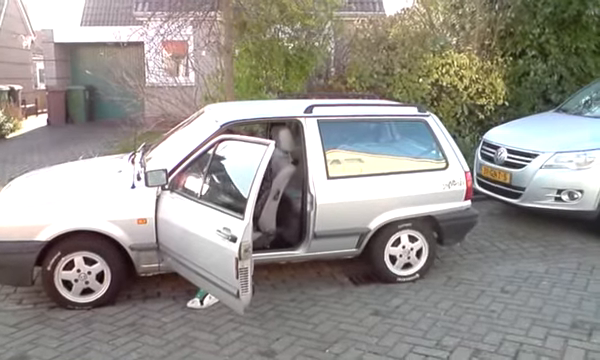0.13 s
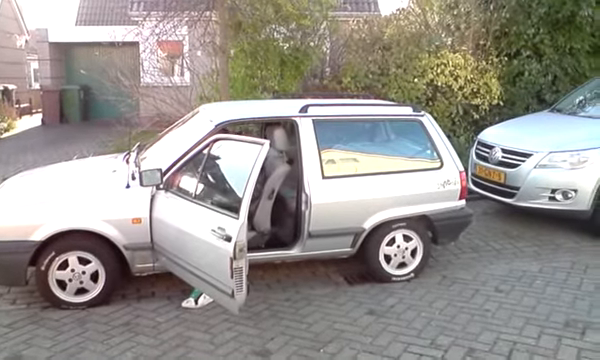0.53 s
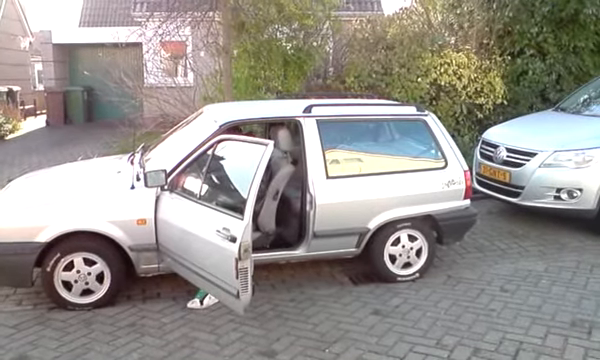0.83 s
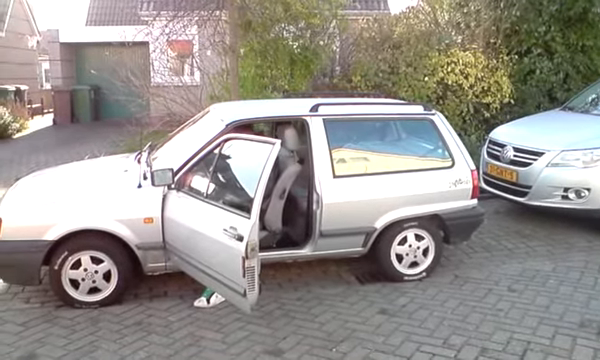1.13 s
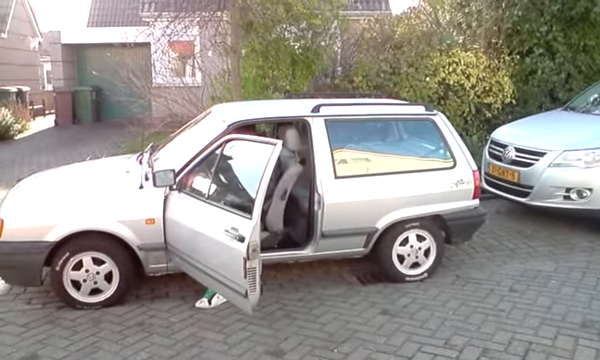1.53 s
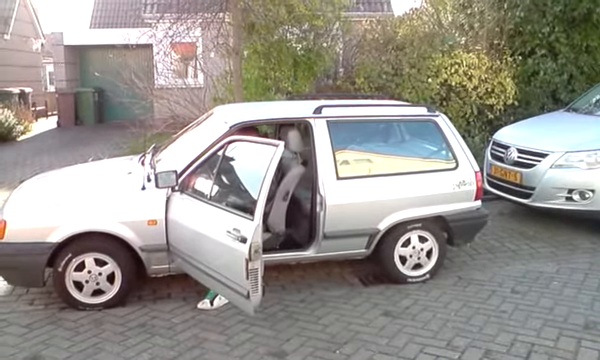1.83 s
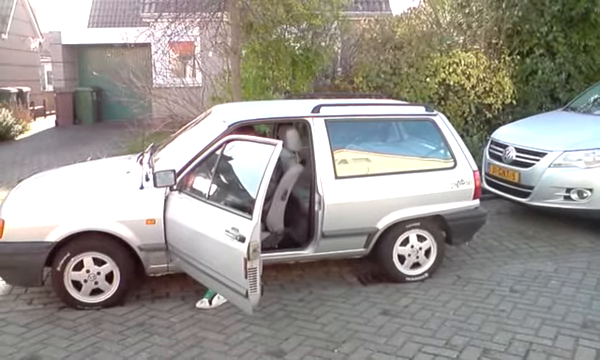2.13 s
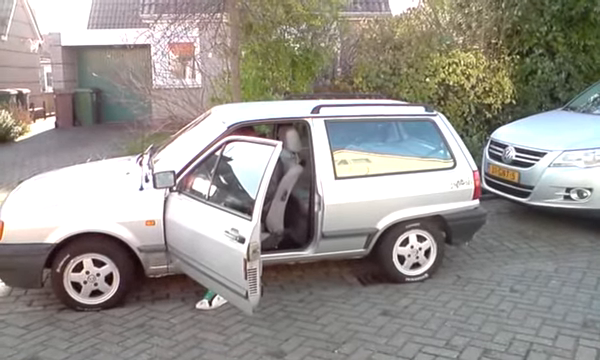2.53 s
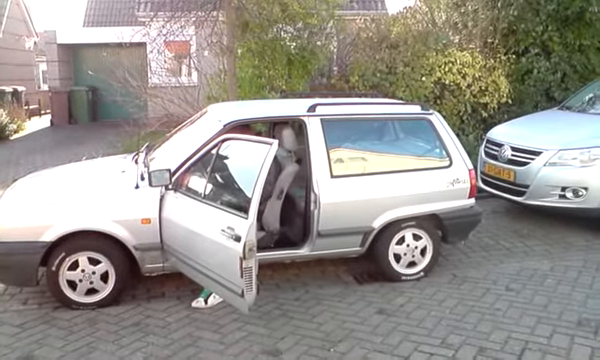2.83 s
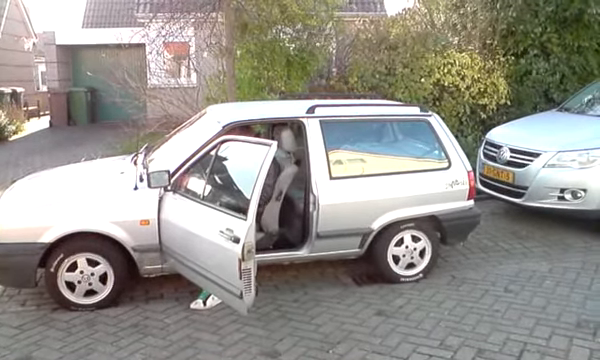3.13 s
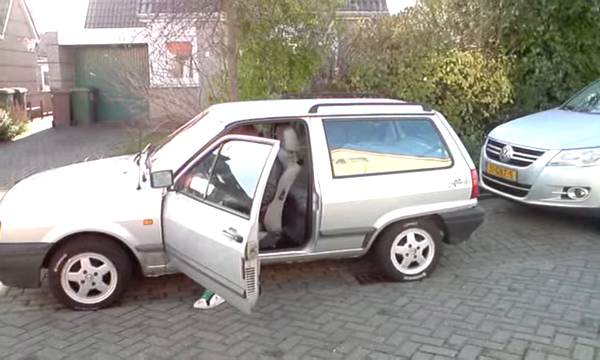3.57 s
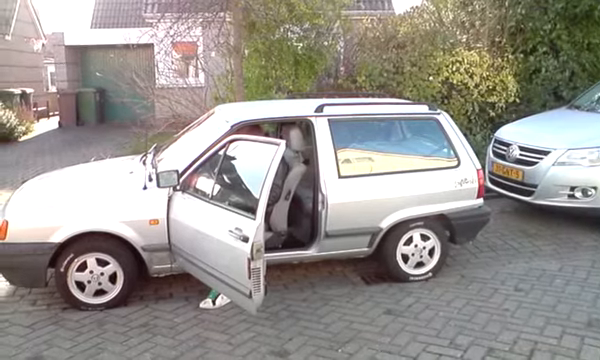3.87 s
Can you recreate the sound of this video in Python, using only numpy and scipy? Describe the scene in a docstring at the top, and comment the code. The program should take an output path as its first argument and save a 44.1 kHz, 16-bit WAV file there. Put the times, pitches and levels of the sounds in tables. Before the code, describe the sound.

Car starter cranking outdoors: first sparse key and lock clicks, then the hiss steps up with soft cabin knocks, brighter key jingles, and finally a sharp metallic clash and laboured cranking, mono with dulled top treble.

```python
"""Keys click and tinkle in an ignition lock over a quiet outdoor hiss: a small car on a paved driveway, door open.
Filtered contact noise makes the clicks and damped tones the tinkles; the hiss steps up and soft knocks follow.
The starter pinion slams into the flywheel: bursts of contact noise that ring the modes of the gears.
Then it cranks: random-strength tooth knocks, scraping and whine slow down and swell against each compression,
and the gears rattle loosely, mostly after a load peak as the piston goes over the top."""
import sys
import numpy as np
from scipy import signal
from scipy.fft import rfft, irfft, next_fast_len
from scipy.io import wavfile
from scipy.ndimage import uniform_filter1d, map_coordinates

SR = 44100
rng = np.random.default_rng(int(sys.argv[2]) if len(sys.argv) > 2 else 0)


def master(y):
    """Save y as 16-bit WAV."""
    cut = np.clip(np.atleast_2d(y).T, -1, 1)
    pcm = np.round(cut * 32767)  # scale
    wavfile.write(sys.argv[1], SR, pcm.astype(np.int16))


N = 176400


def amp(db):
    """Decibels to gain."""
    return 10 ** (np.asarray(db) / 20)


def unit(x):
    """Scale to rms 1."""
    return x / np.sqrt(np.mean(x ** 2) + 1e-20)


def clock():
    """Time of each sample in seconds."""
    return np.arange(N) / SR


def along(points, hz):
    """Gain through (freq_hz, level_db) points, read on a log frequency axis."""
    freq_hz, level_db = np.transpose(points)
    return amp(np.interp(np.log(hz + 1), np.log(freq_hz + 1), level_db))


def resonant(modes, hz, peak_db):
    """Resonances that stand above a flat response."""
    peaks = sum(amp(db) ** 2 / (1 + (2 * (hz - f) / width) ** 2) for f, width, db in modes)
    return np.sqrt(1 + amp(peak_db) ** 2 * peaks)


def colour(x, gain):
    """Causal, minimum-phase filter with the given gain over frequency."""
    m = 2 * next_fast_len(N // 2 + SR // 8)
    log_gain = np.log(np.maximum(gain(np.fft.rfftfreq(m, 1 / SR)), 1e-6))
    cepstrum = irfft(log_gain, m)
    # folding the cepstrum forward in time makes the filter causal
    cepstrum[1:m // 2] *= 2
    cepstrum[m // 2 + 1:] = 0
    return irfft(rfft(x, m) * np.exp(rfft(cepstrum)), m)[:N]


def shaped(x, gain):
    """Colour that keeps the power of a white input."""
    mean_power = np.mean(gain(np.linspace(0, SR / 2, N // 8)) ** 2)
    return colour(x, gain) / np.sqrt(mean_power)


def decay(start, t60, attack):
    """Quick rise, exponential fall of 60 dB per t60."""
    age = np.maximum(clock() - start, 0)
    return (1 - np.exp(-age / attack)) * amp(-60 * age / t60)


def swell(t, rise, fall):
    """A smooth hump around t = 0."""
    return np.exp(-.5 * (t / np.where(t < 0, rise, fall)) ** 2)


def grit(per_s):
    """Tiny metal contacts at random moments, rms 1."""
    return unit(rng.standard_normal(N) * (rng.random(N) < per_s / SR))


def strikes(envelopes, brightness, gain, split_hz):
    """Bursts of contact noise, each with its own share of treble above the split."""
    contacts = unit(np.sign(grit(per_s=14000)))
    dull = contacts * sum(envelopes)
    bright = contacts * sum(e * amp(b) for e, b in zip(envelopes, brightness))
    b, a = signal.butter(1, split_hz, fs=SR)
    bass = signal.lfilter(b, a, dull)
    treble = bright - signal.lfilter(b, a, bright)
    return shaped(bass + treble, gain)


# compression strokes: peak_load_s, buildup_s, load_db,
# loaded_hz (tooth rate one stroke alone drags the spun-up gears to), grind_lead_s, housing_ring_db
COMPRESSIONS = [(3.312, .035, -4, 291.6, 0, -1.5), (3.445, .04, 0.5, 240.4, 0.027, -2.5),
                (3.603, 0.041, -1.5, 310.7, 0.015, -2.5), (3.738, .028, -1.5, 319, 0.02, -4),
                (3.862, 0.027, -3, 321.1, 0.014, 0.5), (3.99, .035, -2.5, 336.6, 0.016, -21)]
# resonances of the starter and bell housing: freq_hz, width_hz, level_db
HOUSING_MODES = [(713, 30, -6), (765, 30, -5), (862, 30, -3), (910, 35, -6), (1017, 30, -10),
                 (1147, 35, -8), (1300, 45, -10), (1450, 35, -9), (1729, 40, -11), (1870, 40, -9),
                 (1962, 40, -9), (2077, 35, -4), (2555, 30, -5), (2630, 45, -4)]
# relative spectrum of the meshing teeth: freq_hz, level_db
MESH_SPECTRUM = [(30, -44), (100, -45), (220, -8), (340, -13.5), (480, -12), (700, -4), (900, -2.5),
                 (1200, -16.5), (2500, -22.5), (6000, -39)]
# relative spectrum of the grinding teeth: freq_hz, level_db
GRIND_SPECTRUM = [(40, -57), (200, -43), (600, -7.5), (1200, -5.5), (1600, -6.5), (2100, -4), (2650, -8.5),
                  (2850, -11.5), (4200, -8), (5200, -19.5), (7000, -25), (10000, -35)]
# gear whine at the first multiples of the tooth rate, before the load: level_db
WHINE_LEVELS = [-50, -49, -45, -47, -49, -48, -50]
CRANK_S, SPIN_UP_S, FREE_HZ = 3.235, .07, 538.2  # motor start, its time constant, free tooth rate
RELEASE_S, IDLE_LOAD_DB = 0.034, -25  # fall of the load after its peak, load between strokes
MESH_DB, GRIND_DB = -41, -36


def cranking(jitter_s=.00006, scatter_db=4.0, rough=0.7, gate=0.3, slow_lag_s=.018, recover_s=.03, flutter_db=2):
    """Each tooth knocks the housing and scrapes; each compression makes the teeth slower and louder."""
    t = clock()
    running = np.clip((t - CRANK_S) / 0.017, 0, 1)
    drag_hz, load, friction = 0, amp(IDLE_LOAD_DB), amp(IDLE_LOAD_DB)
    for peak_s, rise_s, load_db, loaded_hz, lead_s, _ in COMPRESSIONS:
        # the teeth slow down a little after the load peaks; the grinding may come ahead of it
        drag_hz = drag_hz + (FREE_HZ - loaded_hz) * swell(t - peak_s - slow_lag_s, rise_s, recover_s)
        load = load + amp(load_db) * swell(t - peak_s, rise_s, RELEASE_S)
        friction = friction + amp(load_db) * swell(t - peak_s + lead_s, rise_s, RELEASE_S)
    spin_up = 1 - np.exp(-np.maximum(t - CRANK_S, 0) / SPIN_UP_S)
    teeth = np.cumsum((FREE_HZ - drag_hz) * spin_up) / SR  # teeth passed so far

    # one knock per tooth, with random timing and strength
    tooth_s = np.interp(np.arange(1, int(teeth[-1])), teeth, t)
    chance = rng.standard_normal((1000, 2))[:len(tooth_s)]
    where = np.clip((tooth_s + jitter_s * chance[:, 0]) * SR, 0, N - 1).astype(int)
    knocks = unit(np.bincount(where, amp(scatter_db * chance[:, 1]), N)) * np.sqrt(running.mean())

    contact = (knocks + rough * grit(per_s=4300)) * load * running
    mesh = shaped(contact, lambda f: along(MESH_SPECTRUM, f) * resonant(HOUSING_MODES, f, peak_db=16.5))

    # the scraping pulses once per tooth
    scrape = unit(grit(per_s=7000) * (1 + gate * np.cos(2 * np.pi * teeth))) + 0.39 * knocks
    grind = shaped(scrape * friction * running,
                   lambda f: along(GRIND_SPECTRUM, f) * resonant(HOUSING_MODES, f, peak_db=16))

    whine = 0
    for k, level_db in enumerate(WHINE_LEVELS):
        flutter = amp(flutter_db * map_coordinates(rng.standard_normal(260), [t * 60]))
        whine = whine + amp(level_db) * flutter * np.sin(2 * np.pi * (k + 1) * teeth)
    return amp(MESH_DB) * mesh + amp(GRIND_DB) * grind + whine * load * running


RING_HZ, RING_DB = 854.8, -32.5  # the housing's strongest mode, its level before each stroke's own


def housing_ring(lag_s=.009, rise_s=.018, fall_s=0.014, stray_hz=6):
    """The housing sings briefly at the top of each compression, one slightly detuned tone each."""
    t = clock()
    ring = 0
    for peak_s, *_, ring_db in COMPRESSIONS:
        hz = RING_HZ + stray_hz * rng.standard_normal()
        tone = np.sin(2 * np.pi * hz * (t - peak_s))
        ring = ring + amp(RING_DB + ring_db) * swell(t - peak_s - lag_s, rise_s, fall_s) * tone
    return ring


# the loose gears rattle: start_s, level_db, t60_s (before the extra fade)
LOOSE_GEARS = [(3.275, -44, 0.87), (3.365, -53, 0.25), (3.511, -46, 0.73), (3.568, -50, .12),
               (3.645, -44, 0.72), (3.78, -44, 0.64), (3.905, -45.5, 0.66)]
# relative spectrum of the rattle: freq_hz, level_db
RATTLE_SPECTRUM = [(40, -47), (200, -44), (800, -5), (2500, -15), (3100, -8), (4000, 0.5), (5000, -0.5),
                   (5600, -7.5), (7000, -18.5), (10000, -24)]


def rattle(attack_s=0.0057, fade_s=0.96, clump_db=-0.5):
    """Bright, uneven chatter of the loose gears, started at listed moments, mostly after a load peak."""
    t = clock()
    level = 0
    for start_s, level_db, t60_s in LOOSE_GEARS:
        fade = amp(-60 * (np.maximum(t - start_s, 0) / fade_s) ** 3)
        level = level + amp(level_db) * decay(start_s, t60_s, attack_s) * fade
    clumps = amp(clump_db * unit(uniform_filter1d(rng.standard_normal(N), size=200)))
    return shaped(unit(grit(per_s=4000) * clumps) * level, lambda f: along(RATTLE_SPECTRUM, f))


# blows of the solenoid and pinion: start_s, level_db (before the trims below), brightness_db, t60_s (of the clash)
PINION_BLOWS = [(3.207, -48, 9, .1), (3.2126, -47.5, 16, 0.23), (3.218, -30, 2, 0.055),
                (3.2298, -22.5, 5.5, 0.097), (3.2384, -16, 1.5, 0.047), (3.2464, -18.5, -19, 0.058),
                (3.258, -28.5, -25, 0.11)]
# resonances of the pinion and ring gear: freq_hz, width_hz, level_db
GEAR_MODES = [(766, 40, -1), (911, 45, 4), (962, 35, -3), (1147, 35, -5), (1428, 26, -3), (1869, 30, -4),
              (2306, 22, -10), (2557, 30, -8), (2675, 22, -8), (3760, 60, -7), (4410, 55, -3),
              (4877, 30, -5), (5050, 34, -7), (5220, 45, -9)]
# relative spectrum of the clash: freq_hz, level_db
CLASH_SPECTRUM = [(40, -48), (150, -16.5), (480, -15), (760, 2), (950, 2), (1300, -5), (2600, -2),
                  (3000, -10.5), (4400, -2), (5100, -3.5), (5800, -12.5), (8000, -21), (10500, -28.5)]
CLASH_DB, CLANG_DB = -1, -11.5  # trims: noise of the blows, ringing of the gears under each


def engagement(bright_hz=2600):
    """The solenoid throws the pinion into the ring gear: a few clashing blows, each ringing the gears."""
    bursts = [amp(level_db) * decay(start_s, t60_s, attack=.0007) for start_s, level_db, _, t60_s in PINION_BLOWS]
    clash = strikes(bursts, [row[2] for row in PINION_BLOWS],
                    lambda f: along(CLASH_SPECTRUM, f) * resonant(GEAR_MODES, f, peak_db=7), split_hz=bright_hz)

    clang, age = np.zeros(N), clock()[:SR // 4]
    onset = np.sin(np.pi / 2 * np.minimum(age / .002, 1)) ** 2
    for start_s, level_db, bright_db, _ in PINION_BLOWS:
        for hz, width_hz, mode_db in GEAR_MODES:
            treble_db = bright_db * (hz > bright_hz)
            gain = amp(CLANG_DB + level_db + mode_db + treble_db + 2 * rng.standard_normal())
            tone = np.sin(2 * np.pi * (hz * age + rng.random()))
            clang[int(start_s * SR):][:len(age)] += gain * np.exp(-np.pi * width_hz * age) * onset * tone
    return amp(CLASH_DB) * clash + clang


# key and lock clicks: start_s, level_db, brightness_db
LOCK_CLICKS = [(0.08, -47, -10), (0.089, -46.5, -17), (.236, -48, -14), (0.263, -52, -1), (0.4, -50.5, 7.5),
               (.928, -52, -4), (1.097, -49, -7), (1.156, -60, 7), (1.5385, -44.5, -11), (2.347, -39, -6.5),
               (2.372, -46, 4.5), (2.389, -49, 9), (2.402, -52.5, 8), (2.416, -52.5, 4), (2.459, -45, -4)]
# keys touching on their ring: start_s, level_db
KEY_TINKLES = [(.255, -61), (.386, -64), (1.05, -62), (2.322, -48), (2.385, -53), (2.425, -56)]
# relative spectrum of the clicks: freq_hz, level_db
LOCK_SPECTRUM = [(150, -27.5), (500, -3.5), (850, 3), (1700, 3), (3200, -6), (4400, 3), (5500, -15),
                 (10000, -22.5)]
KEY_HZ, KEY_T60_S, CLICK_RISE_S = 4230, .11, .0012


def keys(click_t60=0.045):
    """The key clicks in the lock as noise bursts while the others tinkle as damped tones."""
    bursts = [amp(level_db) * decay(start_s, click_t60, attack=CLICK_RISE_S) for start_s, level_db, _ in LOCK_CLICKS]
    clicks = strikes(bursts, [row[2] for row in LOCK_CLICKS], lambda f: along(LOCK_SPECTRUM, f), split_hz=1660)
    tinkle = 0
    for start_s, level_db in KEY_TINKLES:
        hz = KEY_HZ * (1 + .004 * rng.standard_normal())
        tone = np.sin(2 * np.pi * hz * clock())
        tinkle = tinkle + amp(level_db) * decay(start_s, KEY_T60_S, attack=.005) * tone
    return clicks + tinkle


# soft knocks in the cabin: start_s, level_db, pitch_hz, t60_s
CABIN_KNOCKS = [(1.886, -45.5, 228, 0.072), (2.049, -43, 755, 0.13), (2.069, -51, 760, 0.054)]


def cabin(thud_db=-5):
    """Soft knocks: one damped mode and a dull puff each."""
    puff_points = [(60, -19), (200, -8), (900, 3), (2000, -22), (6000, -30)]  # freq_hz, level_db
    puff = shaped(rng.standard_normal(N), lambda f: along(puff_points, f))
    knocks = 0
    for start_s, level_db, pitch_hz, t60_s in CABIN_KNOCKS:
        tone = np.sin(2 * np.pi * pitch_hz * (clock() - start_s))
        knocks = knocks + amp(level_db) * decay(start_s, t60_s, attack=0.0018) * (tone + amp(thud_db) * puff)
    return knocks


# relative spectrum of the hiss before the step: freq_hz, level_db
QUIET_SPECTRUM = [(25, -31), (70, -27), (160, -16), (260, -10.5), (500, -7.5), (800, -3), (1200, -6),
                  (2000, -9), (4300, -12), (7700, -15.5), (10500, -16.5)]
# relative spectrum of the hiss after the step: freq_hz, level_db
LOUD_SPECTRUM = [(25, -53), (60, -22), (120, -15), (220, -10), (500, -3.5), (800, 0), (1200, -2),
                 (2000, -7), (4300, -9.5), (8500, -13), (10500, -14)]
QUIET_DB, LOUD_DB, STEP_S = -60, -52, 1.886


def background():
    """Steady outdoor hiss, shaped noise that steps up abruptly to a higher level."""
    up = np.clip((clock() - STEP_S) / 0.008, 0, 1)
    quiet = shaped(rng.standard_normal(N), lambda f: along(QUIET_SPECTRUM, f))
    loud = shaped(rng.standard_normal(N), lambda f: along(LOUD_SPECTRUM, f))
    return (1 - up) * amp(QUIET_DB) * quiet + up * amp(LOUD_DB) * loud


def driveway(x, wet_db=-11, t60=0.17):
    """Short scatter from the engine bay, paving and walls: a decaying noise tail."""
    tail = (rng.standard_normal(N) * decay(0.0016, t60, attack=0.00067))[:SR // 2]
    return x + amp(wet_db) * signal.fftconvolve(x, tail / np.linalg.norm(tail))[:N]


def scene():
    """Starter, keys, cabin and background at one microphone."""
    scattered = driveway(cranking() + rattle() + engagement() + keys())
    return (scattered + housing_ring() + cabin() + background())[None]


# treble roll-off of the microphone: freq_hz, level_db
MIC_ROLLOFF = [(10000, 0), (10800, -7.5), (11500, -15.5), (12200, -26)]
TOP_HZ = 12200  # band limit


def record(dry):
    """The microphone's treble rolls off and ends at its band limit."""
    m = next_fast_len(N + SR // 4)
    hz = np.fft.rfftfreq(m, 1 / SR)
    return irfft(rfft(dry, m) * along(MIC_ROLLOFF, hz) * (hz < TOP_HZ), m)[:, :N]


dry = scene()
out = record(dry)
master(out)
```